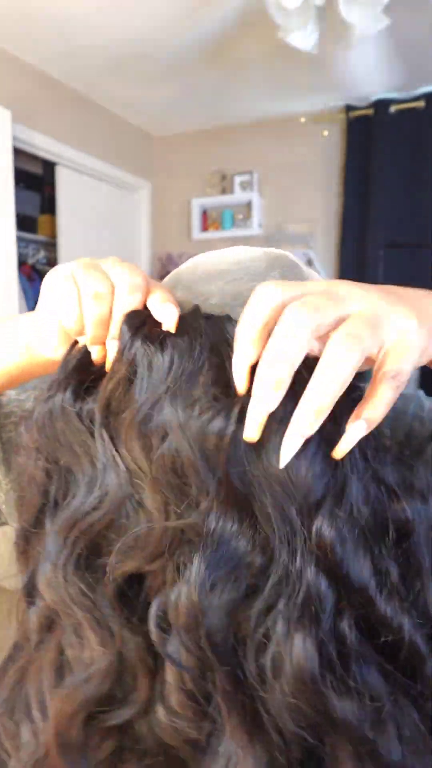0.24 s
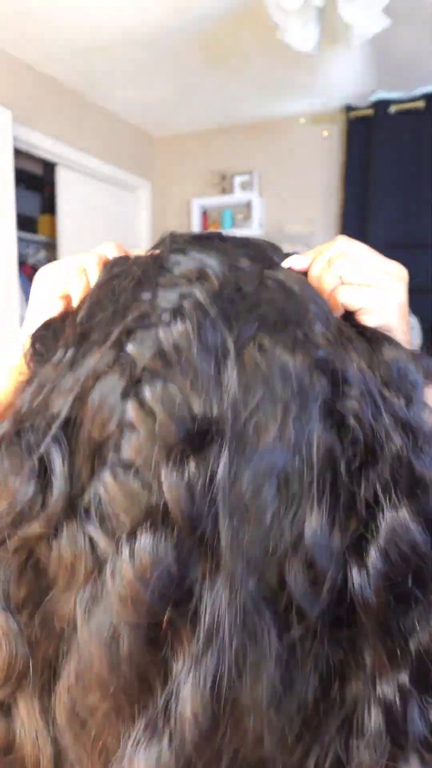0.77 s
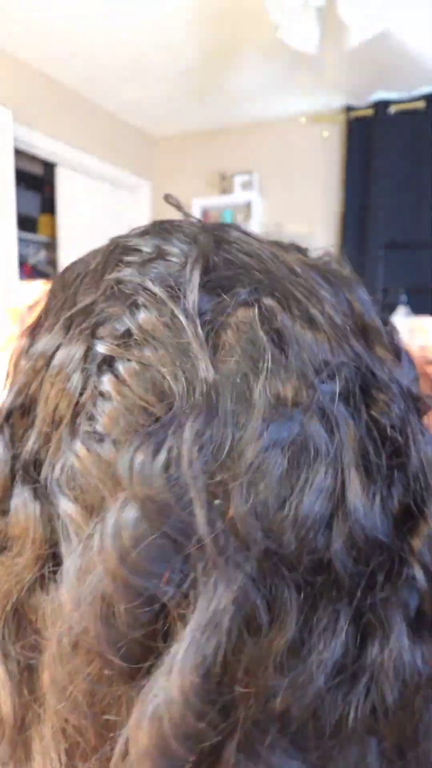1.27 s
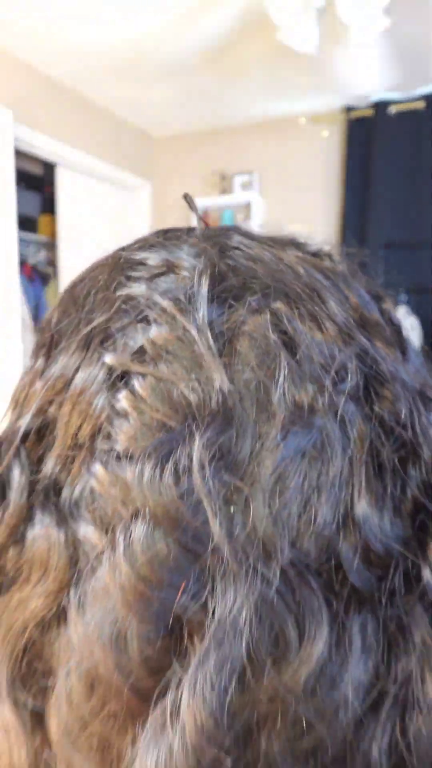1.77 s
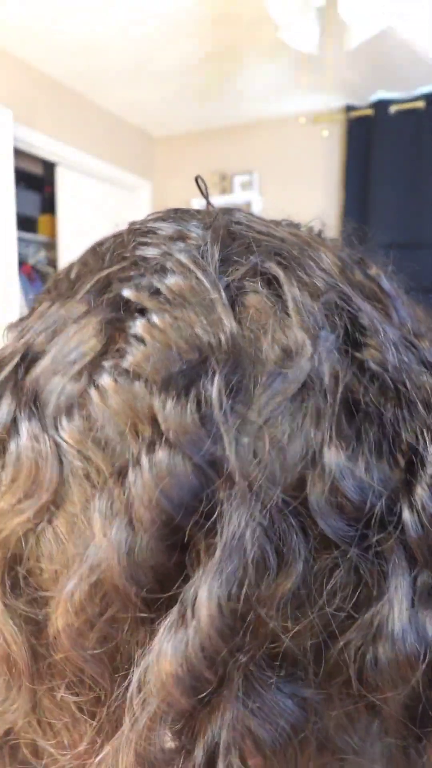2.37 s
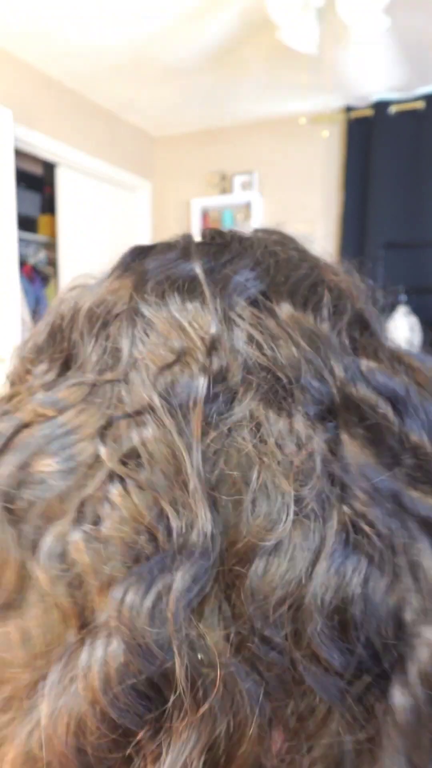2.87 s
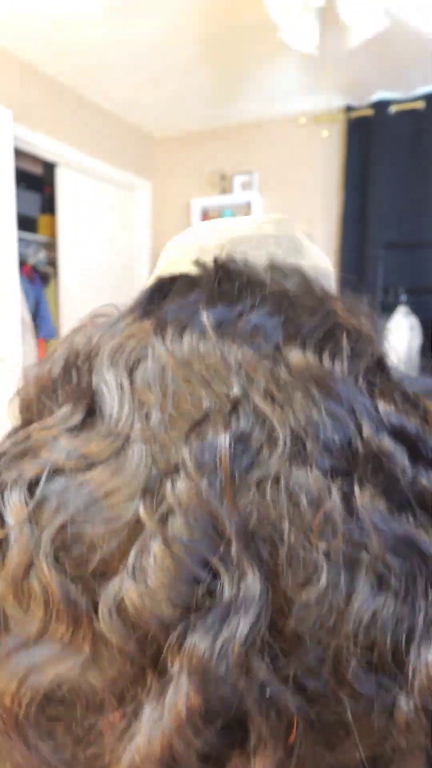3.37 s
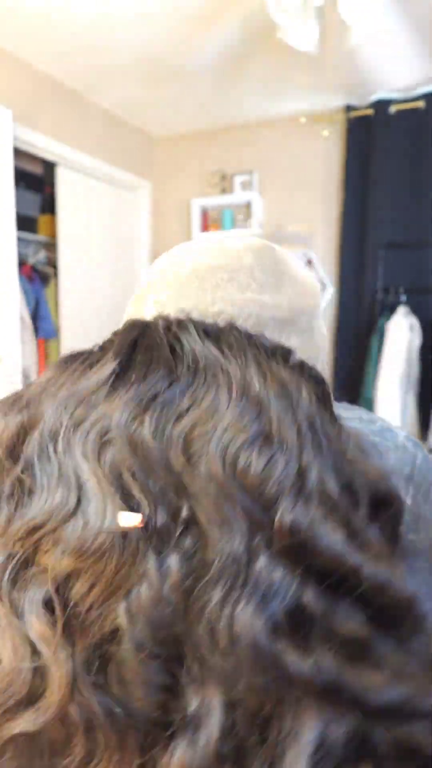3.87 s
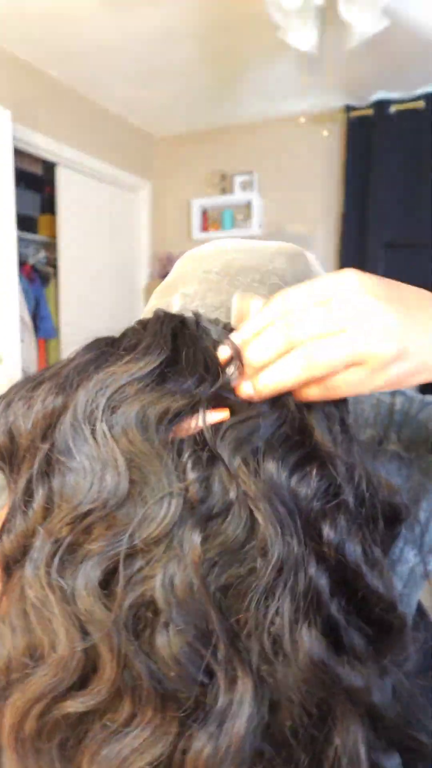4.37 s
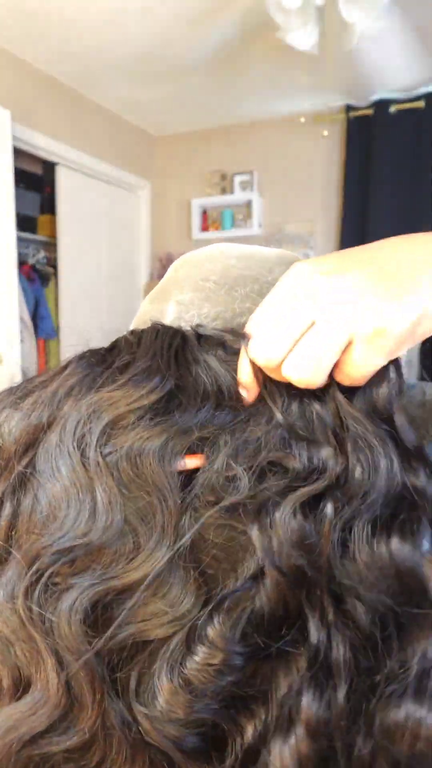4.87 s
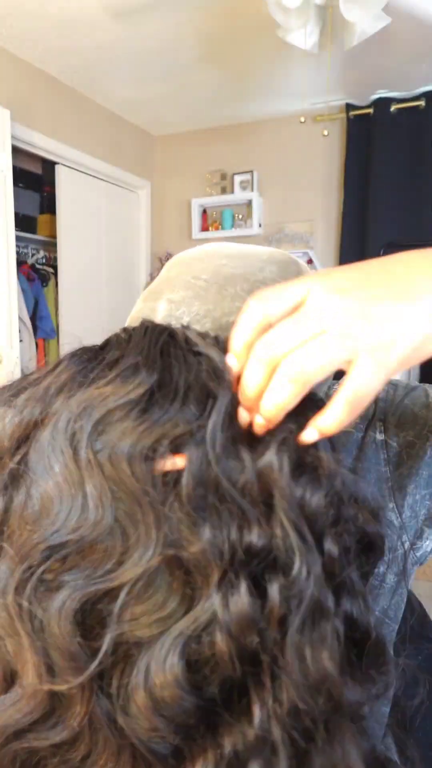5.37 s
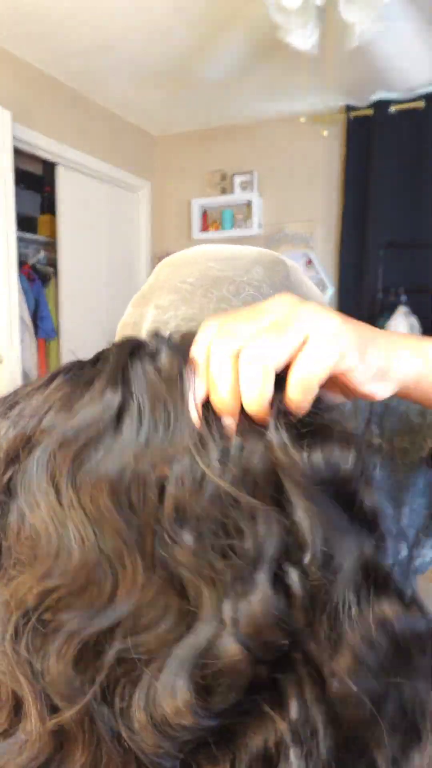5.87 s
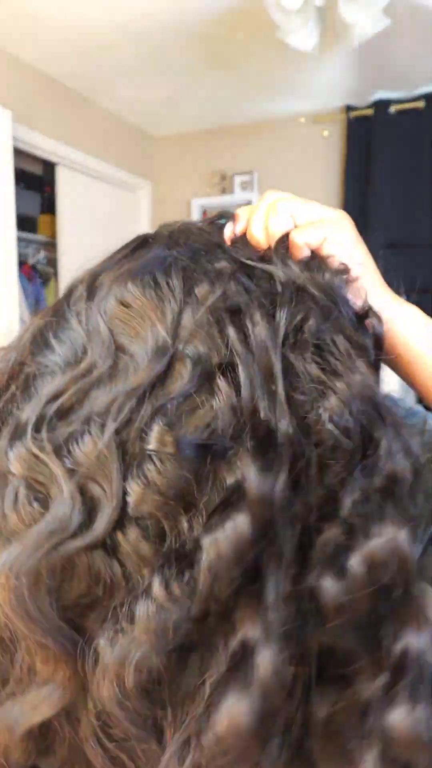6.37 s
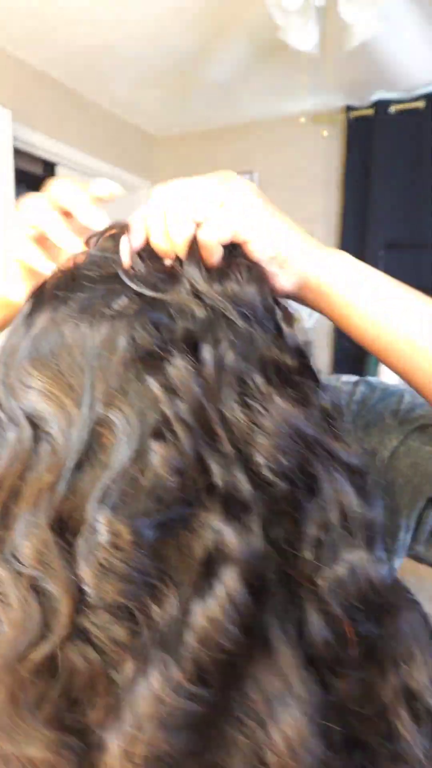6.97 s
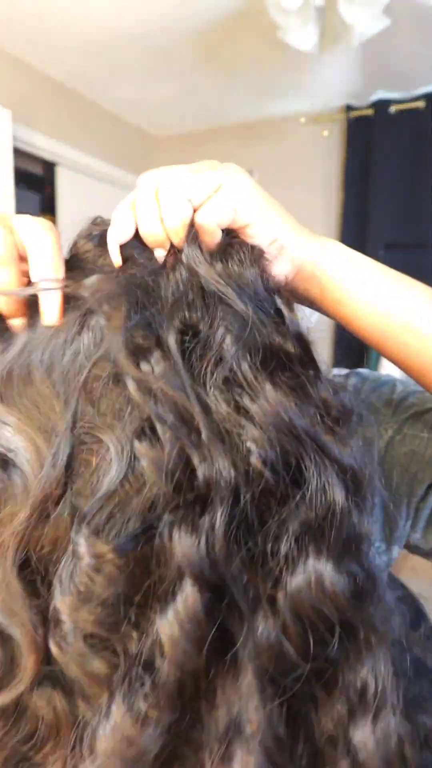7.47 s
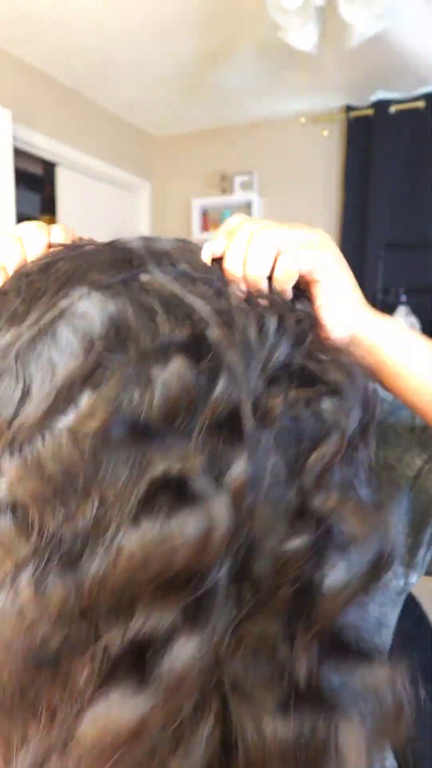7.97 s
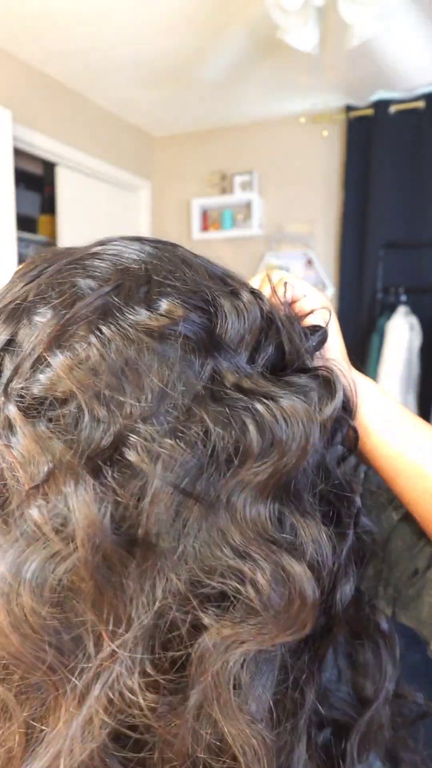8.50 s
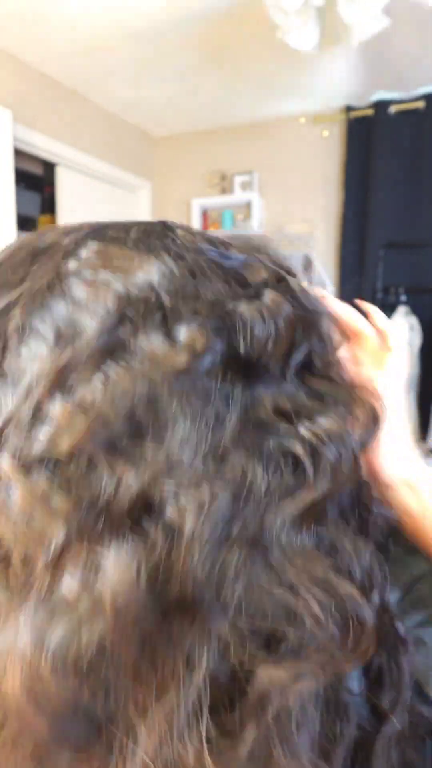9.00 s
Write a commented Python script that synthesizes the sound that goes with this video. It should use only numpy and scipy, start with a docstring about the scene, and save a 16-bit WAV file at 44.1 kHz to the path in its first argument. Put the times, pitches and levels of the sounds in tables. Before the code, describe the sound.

Close to a phone's stereo microphones in a small quiet bedroom, hands pull a long synthetic wig. Busy bright swishes and crackling strands fill the first second, a sharp scrape follows, then smoother slides. The middle is sparse and soft apart from a dull bump. Later come crisp snaps, a bright cluster and more rustling. A faint low hum and airy rumble stay underneath.

```python
"""Wig pulled close to a phone

Small quiet bedroom; hands tug a long synthetic wig close to the phone's two microphones.
Fibres slide as swelling filtered noise, strands and cap netting snap as short coloured bursts,
and soft bumps ring damped furniture modes; the room adds a short, dull noise tail.
An appliance holds one steady sine; air noise and a rumble in the room's lowest resonances lie below."""
import sys
import numpy as np
from scipy import signal
from scipy.fft import rfft, irfft
from scipy.io import wavfile
from scipy.ndimage import uniform_filter1d, map_coordinates

SR = 44100
rng = np.random.default_rng(int(sys.argv[2]) if len(sys.argv) > 2 else 0)


def wav_record(signal):
    """Record a signal, one row per channel, as 16-bit PCM in the file named by sys.argv[1]."""
    frames = np.transpose(np.atleast_2d(signal))
    bounded = np.clip(frames, -1, 1)
    # unit amplitude maps onto the largest positive 16-bit level
    quanta = np.round(bounded * 32767).astype(np.int16)
    wavfile.write(sys.argv[1], SR, quanta)


def amplitude_ratio(level_db):
    """Convert a level in decibels to the matching linear amplitude (field) ratio."""
    exponent = np.asarray(level_db, float) / 20
    return 10 ** exponent


N = 407484
TIME = np.arange(N) / SR  # s

# steady appliance note: f/Hz, level/dB, left minus right/dB, spread of the wavering/dB
APPLIANCE_HUM = (259, -49, 3.3, .7)
# colour of the air noise: f/Hz, relative level/dB per Hz
AIR_COLOUR = [(20, -50), (32, -42), (45, -26), (75, -22), (110, -1.5), (200, 3.5), (300, 3), (400, -10),
              (600, -13), (1000, -20), (2000, -22.5), (5000, -27), (10000, -28.5), (15500, -24.5)]
AIR_DB = -56
# width of the air noise: f/Hz, side minus mid/dB
AIR_WIDTH = [(30, -60), (125, -18.5), (500, -6), (2000, -4), (12000, -8)]
# lowest room resonances: f/Hz, width/Hz, level/dB against the rumble
ROOM_MODES = [(57, 17, -10), (123.4, 11.5, 2), (144.3, 6.4, 0.5), (208, 25, -11)]
RUMBLE_DB, RUMBLE_SWELL_DB = -55, 1.25

# where the hands work: t/s, grip on the cap/dB, left minus right/dB
HANDS_PLACE = [(0, 1, 2), (.6, 3.5, 0.4), (1.1, 1, 0.7), (1.65, -3.5, 5.5), (2.1, -0.5, 4), (2.8, -0.5, 0),
               (3.3, -3, 0.5), (4, 2, 2.5), (4.8, -6, 0.2), (5.4, -2, 2), (6.1, -3.5, 0.5), (6.8, -0.5, 3),
               (7.5, -0.5, 1.3), (7.9, -2, 1), (8.6, -1, 0.3), (9.24, 0, .7)]
# pulls and slides of the hair: t/s, hiss level/dB, last 10 dB of rise/ms, first 10 dB of fall/ms,
# sheen over hiss/dB
HAIR_STROKES = [(.02, -62.5, 100, 200, 2.5), (.122, -51.5, 16, 77, 5), (.231, -57, 30, 200, 2),
                (.375, -50, 73, 87, 2.5), (.577, -49.5, 162, 220, 1.5), (.75, -49.5, 38, 100, 1),
                (.81, -40.5, 36, 74, 3.5), (.89, -45, 100, 34, 1), (1.02, -70, 80, 100, -7),
                (1.167, -58.5, 150, 128, 0), (1.63, -62, 55, 60, 6), (1.68, -40, 11.5, 30.5, 0.5),
                (1.79, -56.5, 18, 62, 3), (1.9, -69, 80, 150, 1), (2.043, -62, 33, 92, -3.5),
                (2.25, -72, 200, 200, 8), (2.43, -61, 56, 200, 4), (2.62, -56.5, 222, 150, 5),
                (2.78, -46.5, 105, 80, 1), (3.01, -47, 90, 54, 4), (3.12, -68, 79, 95, 4),
                (3.27, -54.5, 100, 100, 3.5), (3.391, -46.5, 88, 65, 5), (3.52, -64.5, 60, 234, 4),
                (3.94, -74.5, 100, 200, 11), (4.147, -65.5, 90, 250, -2), (4.368, -60.5, 62, 166, 6.5),
                (4.63, -64.5, 86, 252, 6.5), (4.831, -57.5, 55, 37, 6), (4.953, -61, 61, 90, 3.5),
                (5.182, -63.5, 76, 80, 5), (5.23, -60, 25, 78, 0), (5.43, -56, 35, 122, 2),
                (5.6, -68.5, 100, 100, 4), (5.671, -60.5, 53, 198, 5), (6.026, -53, 170, 150, 2),
                (6.17, -54, 100, 207, 4.5), (6.36, -54, 204, 34, 3), (6.503, -66, 150, 300, 6.5),
                (6.793, -50.5, 1, 38, 0), (6.85, -64, 30, 98, -8), (7.002, -62.5, 44, 200, -1),
                (7.174, -64, 250, 53, 8), (7.252, -65, 50, 50, 2), (7.33, -69.5, 100, 150, 10),
                (7.405, -55, 11, 40, 4), (7.5, -63, 98, 150, 6.5), (7.609, -56.5, 43, 60, 7),
                (7.7, -60, 80, 50, 7.5), (7.742, -43.5, 12, 27, 6.5), (7.796, -51, 50, 60, 5.5),
                (7.9, -51.5, 42, 60, 3), (7.95, -49.5, 62, 110, 1.5), (8.1, -57, 120, 196, 3.5),
                (8.345, -48.5, 123, 65, 3.5), (8.46, -61, 95, 150, 6), (8.588, -57.5, 120, 80, 7),
                (8.72, -61, 150, 104, 8), (8.94, -52, 53, 100, 2), (9.12, -66, 100, 250, 5)]
STROKE_ROUND, REST_DB = 0.99, -84  # 1 = pointed top, 2 = round top; hiss between strokes
# cap body under a -50 dB hiss before grip, dB per dB of hiss, smoothing each way in time
CAP_DB, CAP_FOLLOWS, CAP_SMOOTH_MS = -57.5, 0.84, 9.1
# colour of sliding fibres, shaping each band from within: f/Hz, relative level/dB per Hz
FIBRE_COLOUR = [(400, -12.5), (800, -13.5), (1400, -9.5), (1800, -6), (2400, -10.5), (3000, -2), (5000, -2),
                (8000, -1.5), (10500, 2), (13200, -0.5), (15300, 4.5), (16000, -9), (16600, -37)]
# borders between body, hiss and sheen: f/Hz, f/Hz
BAND_BORDERS = (2600, 8000)
# echo off a hand close to the hair: t/s, share/0-1, delay/ms
HAND_ECHO = [(0, .12, .3), (1.5, .12, .45), (3.5, .12, .35), (4.25, .26, .655), (5.75, .26, .655),
             (6.1, .13, .5), (7.5, .1, .3), (9.24, .1, .45)]

ROOM_T60_S, ROOM_DB, ROOM_GAP_MS, ROOM_TOP_HZ = 0.28, -15.5, 0.92, 9200
ROOM_ALIKE = 0.42  # share of the tail's power common to both microphones

# snapping strands: t/s, hump level/dB against a unit click before the low cut, centre f/Hz,
# octaves to 10 dB down (at least 0.3 is used), 60 dB decay/ms
STRAND_SNAPS = [(.0793, -15.5, 14100, 2, 4.5), (0.1185, -11.5, 7800, 0.7, 4.5), (0.123, -20, 3500, 8, 4.1),
                (0.2314, -14, 1880, 2.3, 4.5), (0.3775, -8, 1810, 1, 10), (0.4606, -18, 8500, 1.7, 3.6),
                (0.687, -15, 3400, 1.3, 4.5), (0.7325, -15.5, 1900, 4.5, 4.5),
                (0.7528, -14.5, 2200, 1.5, 5.1), (0.8108, -10, 6000, 2, 4.5), (0.828, -1, 4260, 1.1, 2.7),
                (.8462, -27, 7000, 4, 4.5), (.8608, -13, 5800, 1.3, 4.9), (.902, -7, 1890, 1.7, 4.5),
                (.9302, -18.5, 7500, 1.1, 4.5), (1.0519, -27.5, 7000, 2, 4.5), (1.061, -22.5, 2600, 2, 5.3),
                (1.61, -22.5, 6000, 1.2, 9.5), (1.6727, -9, 9000, 3.5, 12), (1.6838, -5.5, 7000, 1, 8.3),
                (1.7799, -6.5, 12100, 1.2, 9.7), (1.8055, -14, 9000, 1, 4.5), (1.8334, -23, 4500, 4, 5),
                (2.4188, -9, 5900, 0.5, 3.2), (2.431, -14.5, 12500, 3, 7.1), (3.9306, -28, 12000, 2.5, 5.2),
                (4.2409, -21.5, 13000, 0.5, 4.5), (4.3716, -21, 13000, 1, 4.5),
                (4.7966, -23, 11000, 0.2, 4.5), (4.83, -22, 6000, 1, 6.4), (4.9396, -25, 5800, 1.1, 4.5),
                (4.984, -21, 6000, 1.5, 4.5), (5.2278, -16, 6000, 1.5, 5.2), (5.4145, -21, 3000, 1.5, 5.5),
                (5.665, -14, 5000, 0.7, 4), (5.687, -22, 5800, 1.2, 4.5), (6.7897, 0.5, 7900, 1, 7.7),
                (6.9975, -28, 12000, 9, 5), (7.25, -24, 3000, 7.5, 6.7), (7.3993, 1, 11300, 0.52, 3.5),
                (7.4093, -11, 13200, 1.7, 4.5), (7.6083, -9, 11100, 0.8, 5.5),
                (7.6468, -28, 5500, 1.5, 4.5), (7.7188, -14, 9000, 1.3, 4.5), (7.7311, -6, 9500, 1.3, 4.5),
                (7.7412, 7.5, 15700, 0.5, 4.3), (7.7479, -10, 10500, 2.3, 5.2), (7.751, -11, 13300, 3, 6),
                (7.7986, -13, 1800, 3, 5.2), (7.8906, -2, 2400, 1.8, 11), (7.9526, -11.5, 4800, 2.5, 4.5),
                (8.3362, -9, 9500, 1.5, 3), (8.3535, -5.5, 1350, 1, 9.1), (8.5223, -29, 2000, 5, 4.5),
                (9.05, -25.5, 3500, 3, 4.5)]
# broad skirt around the centre; thin strands give little below SNAP_LOW_HZ
SNAP_SKIRT_DB, SKIRT_DB_PER_OCTAVE, SNAP_LOW_HZ = -17.5, 0.5, 1090

# soft bumps: t/s, peak level/dB, brightness/dB per octave, shaking time (26 dB down)/ms
SOFT_BUMPS = [(.115, -37.5, 6.5, 50), (.725, -43, 1.5, 60), (.9, -42.5, 10, 35), (4.244, -32, -4, 130),
              (5.224, -45, -1, 33), (6.516, -39, -13, 70), (6.851, -47, -5, 60), (7.737, -42.5, 6, 40),
              (8.351, -43.5, 13, 59)]
# damped furniture modes: f/Hz, level/dB before the brightness tilt, t60/s
FURNITURE_MODES = [(130, -6, .07), (200, -2, .04), (310, -1, .035), (415, -2, .06), (490, -4, .045),
                   (620, -3, .03), (780, -5, .03), (1160, -5, .02), (1630, -9, .015)]

RUMBLE_CUT_HZ, TOP_HZ = 53, 15850  # low cut of the phone, top limit of the finished sound


def level(x, db):
    """Scale to an rms level."""
    return x * amplitude_ratio(db) / np.sqrt(np.mean(x ** 2))


def colour(x, points):
    """Shape by (Hz, dB) points joined on a log-frequency axis."""
    hz, db = np.transpose(points)
    grid = np.fft.rfftfreq(N, 1 / SR) + 1
    gain = amplitude_ratio(np.interp(np.log(grid), np.log(hz), db))
    return irfft(rfft(x) * gain, N)


def split(x):
    """Hiss, sheen and body bands that add up to the whole sound again."""
    grid, spectrum = np.fft.rfftfreq(len(x), 1 / SR), rfft(x)
    low, below_top = (1 / (1 + (grid / hz) ** 12) for hz in BAND_BORDERS)
    weights = below_top - low, 1 - below_top, low
    return [irfft(spectrum * w, len(x)) for w in weights]


def walk(rate):
    """Random levels held 1 / rate s and smoothed twice, with unit spread."""
    k = int(SR / rate)
    steps = np.repeat(rng.standard_normal(N // k + 1), k)
    slow = uniform_filter1d(uniform_filter1d(steps, k), k)[:N]
    return slow / slow.std()


def pan(x, db):
    """Place a sound between the two microphones by left minus right dB."""
    return x * amplitude_ratio(np.array([db / 2, -db / 2]).reshape(2, -1))


def hum():
    """A steady sine that wavers a little in level."""
    hz, db, pan_db, waver_db = APPLIANCE_HUM
    rms = amplitude_ratio(db + waver_db * walk(7.6))
    return pan(np.sqrt(2) * rms * np.sin(2 * np.pi * hz * TIME), pan_db)


def air():
    """Broad air noise and microphone hiss; a swelling rumble rings the lowest room resonances."""
    mid, side = (level(colour(rng.standard_normal(N), AIR_COLOUR), AIR_DB) for _ in range(2))
    swell = amplitude_ratio(RUMBLE_DB + RUMBLE_SWELL_DB * walk(3.99))
    for hz, width_hz, db in ROOM_MODES:
        b, a = signal.iirpeak(hz, hz / width_hz, fs=SR)
        mid = mid + swell * level(signal.lfilter(b, a, rng.standard_normal(N)), db)
        side = side + swell * level(signal.lfilter(b, a, rng.standard_normal(N)), db)
    return mid + colour(side, AIR_WIDTH) * np.array([[1], [-1]])


def hands_pan(t):
    """Left minus right dB of the hands' place."""
    return np.interp(t, *np.transpose(HANDS_PLACE)[[0, 2]])


def strokes():
    """Strokes rise to a top and fall away, adding in power where they overlap; the cap follows the hiss."""
    t = TIME[::64]
    hiss = sheen = amplitude_ratio(REST_DB) ** 2
    for s, db, rise_ms, fall_ms, sheen_db in HAIR_STROKES:
        away = abs(t - s) * 1000 / np.where(t < s, rise_ms, fall_ms)
        power = amplitude_ratio(db - 10 * away ** STROKE_ROUND) ** 2
        hiss = hiss + power
        sheen = sheen + power * amplitude_ratio(sheen_db) ** 2
    hiss_db, sheen_db = 10 * np.log10([hiss, sheen])
    keep = np.exp(-(t[1] - t[0]) * 1000 / CAP_SMOOTH_MS)
    cap_db = CAP_DB + CAP_FOLLOWS * signal.filtfilt([1 - keep], [1, -keep], hiss_db + 50)
    cap_db = cap_db + np.interp(t, *np.transpose(HANDS_PLACE)[[0, 1]])
    return [np.interp(TIME, t, c) for c in (hiss_db, sheen_db, cap_db)]


def rustle(ticks_a_second=500, spread_db=3, ticks_db=-12, flutter_db=1., wide_db=-11):
    """Countless fibres slip as a hiss; fewer, larger slips tick over it; a hand close by echoes it into a comb."""
    band_db = strokes()
    heights = amplitude_ratio(spread_db * np.minimum(rng.exponential(size=N), 3.5))
    ticks = (rng.random(N) < ticks_a_second / SR) * heights
    # each larger slip chatters for a moment
    chatter = np.convolve(ticks, np.exp(-np.arange(64) / 16.0))[:N]
    grain = amplitude_ratio(flutter_db * walk(45)) * (1 + level(chatter, ticks_db))

    def slips():
        bands = split(colour(grain * rng.standard_normal(N), FIBRE_COLOUR))
        return sum(level(band, 0) * amplitude_ratio(db) for band, db in zip(bands, band_db))

    mid, side = slips(), slips()
    s, share, delay_ms = np.transpose(HAND_ECHO)
    echo, delay_ms = np.interp(TIME, s, share), np.interp(TIME, s, delay_ms)
    delayed = map_coordinates(mid, [(TIME - delay_ms / 1000) * SR], order=3)
    mid = (mid + echo * delayed) / np.sqrt(1 + echo ** 2)
    # so close, each microphone hears partly other fibres
    return pan(mid, hands_pan(TIME)) + amplitude_ratio(wide_db) * side * np.array([[1], [-1]])


def room(x):
    """After a short gap the walls answer with a dull, quick tail, partly different at each microphone."""
    t = np.arange(SR // 2) / SR
    shared, *own = rng.standard_normal((3, len(t)))
    tail = np.sqrt(ROOM_ALIKE) * shared + np.sqrt(1 - ROOM_ALIKE) * np.array(own)
    tail = tail * np.exp(-np.log(1000) * t / ROOM_T60_S) * (t > ROOM_GAP_MS / 1000)
    tail = signal.sosfilt(signal.butter(1, ROOM_TOP_HZ, fs=SR, output="sos"), tail)
    tail = tail * amplitude_ratio(ROOM_DB) / np.sqrt(np.sum(tail ** 2, axis=1, keepdims=True))
    return signal.fftconvolve(x.mean(axis=0, keepdims=True), tail, axes=1)[:, :N]


def snaps(crack=2.34):
    """Each strand lets go with a crack, then a burst that dies in milliseconds, from where the hands are."""
    size, lead = 2048, 256  # samples in all, and ahead of the crack
    out, t = np.zeros((2, N + size)), (np.arange(size) - lead) / SR
    grid = np.fft.rfftfreq(size, 1 / SR) + 1
    thin = 1 / np.sqrt(1 + (SNAP_LOW_HZ / grid) ** 4)
    for s, db, hz, octaves, ms in STRAND_SNAPS:
        decay = np.exp(-np.log(1000) * abs(t) * 1000 / ms) * (t >= 0)
        spectrum = rfft((rng.standard_normal(size) - crack * (t == 0)) * decay)
        # even on the broad scale, ragged on the fine scale
        spectrum = spectrum / np.sqrt(uniform_filter1d(abs(spectrum) ** 2, size=121))
        distance = np.log2(grid / hz)  # octaves
        hump = amplitude_ratio(-10 * (distance / max(octaves, .3)) ** 2)
        skirt = amplitude_ratio(SNAP_SKIRT_DB - SKIRT_DB_PER_OCTAVE * abs(distance))
        snap = irfft(spectrum * amplitude_ratio(db) * (hump + skirt) * thin)
        start = round(s * SR) - lead
        out[:, start:start + size] += pan(snap, hands_pan(s))
    return out[:, :N]


def bumps(rise_ms=1.1):
    """A soft, rough contact shakes the furniture's damped modes, each bump with its own brightness."""
    out, t = np.zeros(N + SR), np.arange(SR // 2) / SR
    # a soft body radiates no deep bass
    no_bass = signal.butter(2, 100, "highpass", fs=SR, output="sos")
    for s, db, tilt_db, ms in SOFT_BUMPS:
        shake = (1 - np.exp(-t * 1000 / rise_ms)) * np.exp(-3 * t * 1000 / ms)
        push = rng.standard_normal(len(t)) * shake
        ring = 0
        for hz, mode_db, t60 in FURNITURE_MODES:
            gain = amplitude_ratio(mode_db + tilt_db * np.log2(hz / FURNITURE_MODES[2][0]))
            ring = ring + gain * np.sin(2 * np.pi * hz * t) * np.exp(-np.log(1000) * t / t60)
        boom = signal.sosfilt(no_bass, signal.fftconvolve(push, ring)[:len(t)])
        start = round(s * SR)
        out[start:start + len(t)] += amplitude_ratio(db) * boom / np.abs(boom).max()
    return out[:N]


def scene():
    """The wig close by, its echo in the room, and the bumps, hum and air around it."""
    wig = rustle() + snaps()
    return wig + room(wig) + bumps() + hum() + air()


def low_pass(x):
    """Removes everything above the highest recorded frequency."""
    return signal.sosfilt(signal.butter(12, 17180, fs=SR, output="sos"), x)


def record(dry):
    """The phone drops the deepest rumble; a steep low-pass cuts the top."""
    thin = signal.sosfilt(signal.butter(2, RUMBLE_CUT_HZ, "highpass", fs=SR, output="sos"), dry)
    mix = signal.sosfilt(signal.ellip(10, .3, 65, TOP_HZ, fs=SR, output="sos"), thin)
    return low_pass(mix)


dry = scene()
out = record(dry)
wav_record(out)
```